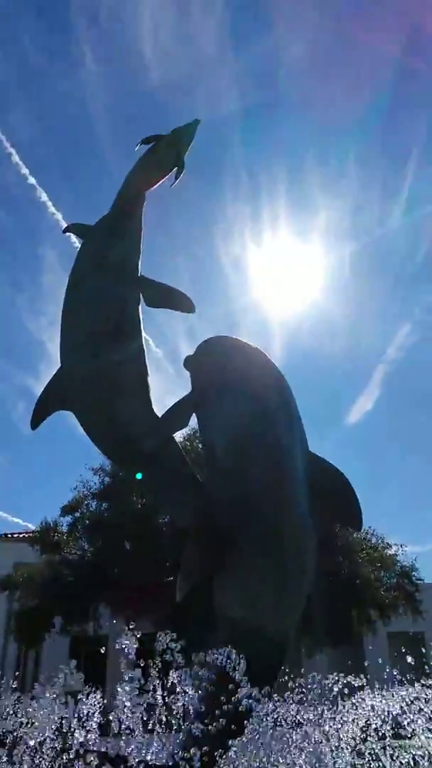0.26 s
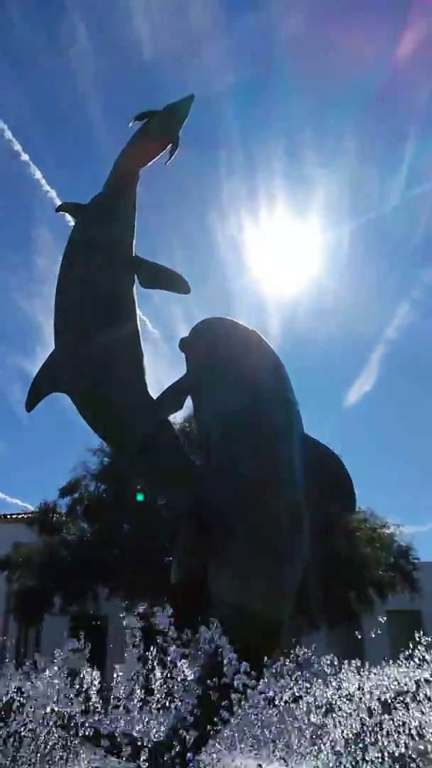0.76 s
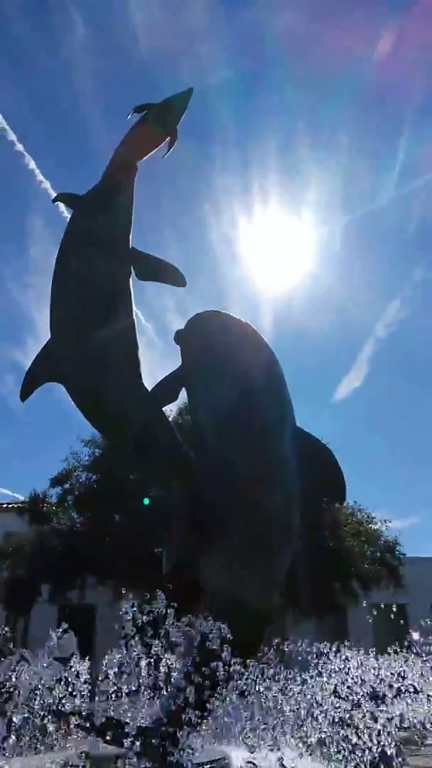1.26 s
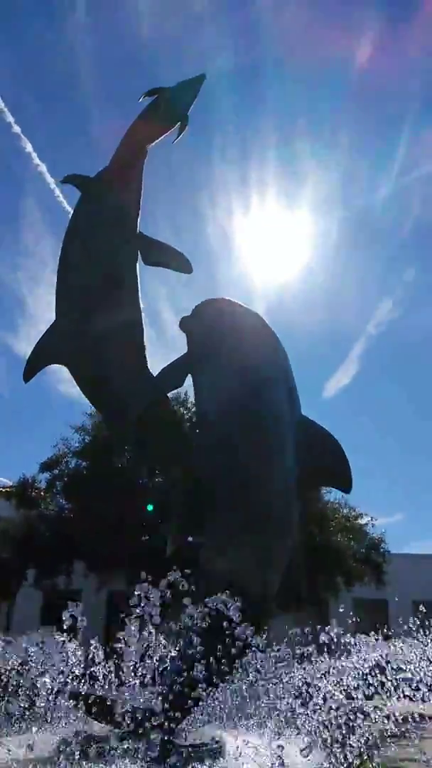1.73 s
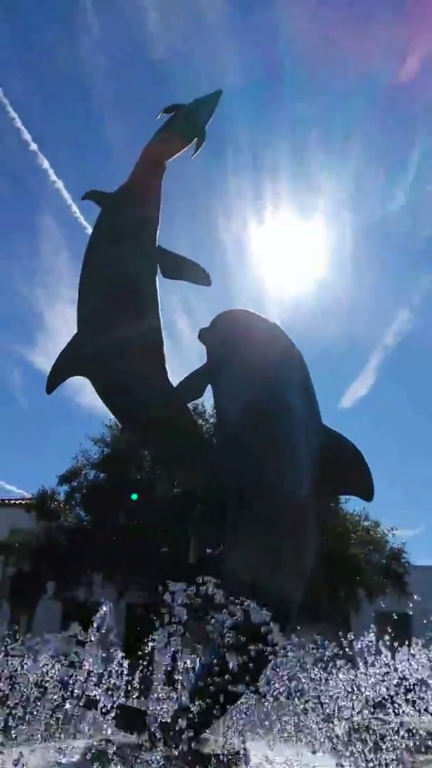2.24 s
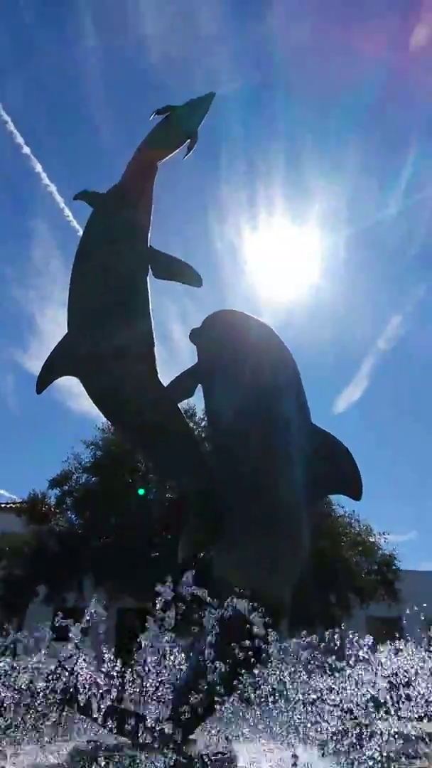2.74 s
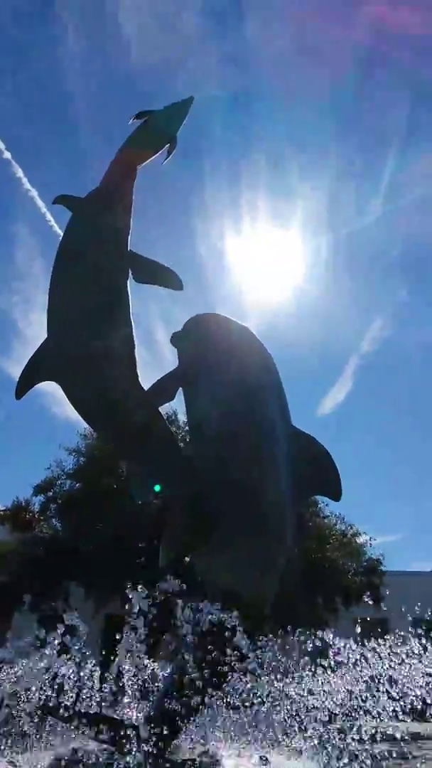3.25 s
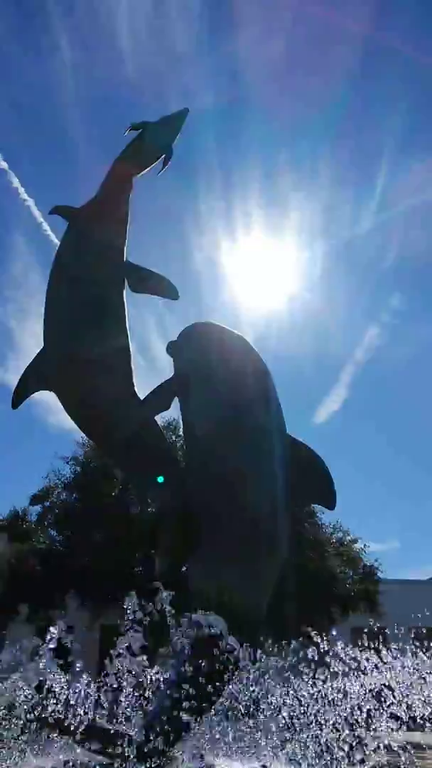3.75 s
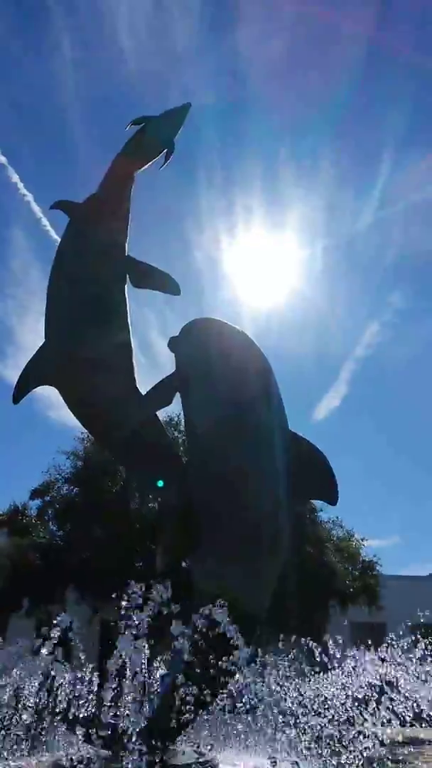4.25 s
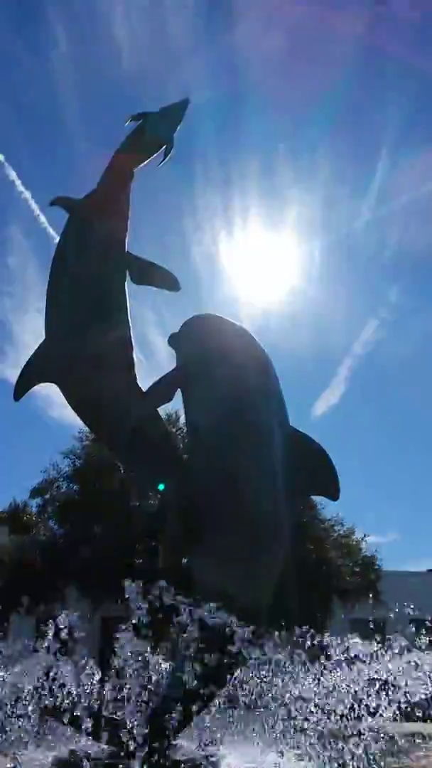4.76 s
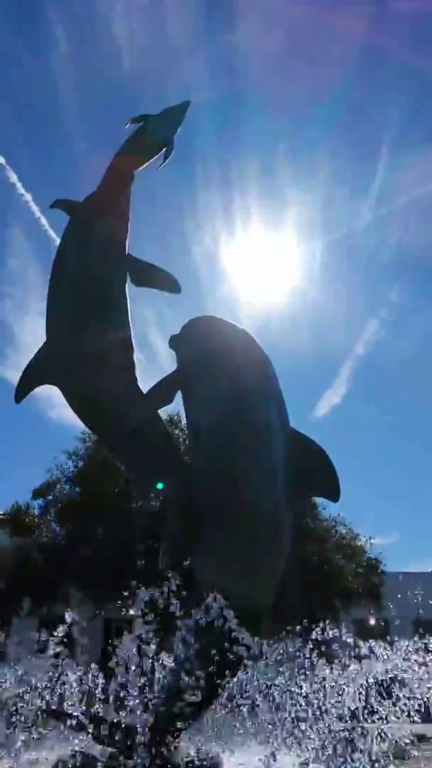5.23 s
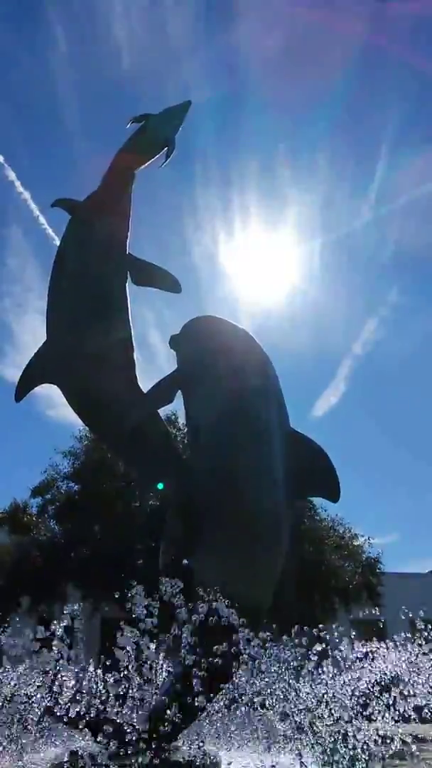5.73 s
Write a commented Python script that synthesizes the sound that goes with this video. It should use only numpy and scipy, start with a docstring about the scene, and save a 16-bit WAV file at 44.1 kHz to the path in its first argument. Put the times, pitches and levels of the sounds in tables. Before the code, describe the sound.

Close outdoor fountain: jets fall back into a basin in a continuous hissing, gurgling rush with plopping bubbles, tiny high tinkles and short hollow drop knocks. Wind thuds low at the very start, gusts roughly between one and two and a half seconds, then eases, with another gust near five seconds. A stereo phone hears bright water mainly on the left; the right is quieter and dull.

```python
"""A basin beside a hollow statue: fountain jets fall back into the water, close to a phone with two microphone ports.
The churn is coloured noise and droplet tones, and rings in a few fixed hollows whose drive simmers and sloshes.
Bubbles plop and tinkle as short tones, big drops knock decaying shell modes, and a few bright cracks are noise.
Wind buffets the ports as lumpy low noise with puffs, and a low two-tone hum comes and goes.
The left port faces the spray; the right one is shaded and dull, and gets the water late and in opposite polarity."""
import sys
import numpy as np
from scipy import signal
from scipy.fft import rfft, irfft, next_fast_len
from scipy.io import wavfile
from scipy.ndimage import uniform_filter1d, map_coordinates

SR = 44100
rng = np.random.default_rng(int(sys.argv[2]) if len(sys.argv) > 2 else 0)


def makeup_ratio(level_db):
    """Linear amplitude ratio for a level in decibels (20 dB per factor of ten)."""
    decades = np.asarray(level_db, float) / 20
    return 10 ** decades


def file_out(sig):
    """Save sig as 16-bit WAV at sys.argv[1]."""
    # one column per channel
    cols = np.atleast_2d(sig).T
    # limit, then scale
    lim = np.clip(cols, -1, 1)
    pcm = np.round(lim * 32767).astype(np.int16)
    wavfile.write(sys.argv[1], SR, pcm)


N = 264159  # samples in the scene
LAG = 17  # samples by which water sounds reach the right port late


def unit(x):
    """Scale to rms 1."""
    return x / np.sqrt(np.mean(x ** 2, axis=-1, keepdims=True) + 1e-20)


def along(points, hz):
    """Read a (frequency, value) curve on a log frequency axis."""
    f, v = np.transpose(points)
    return np.interp(np.log(hz + 1), np.log(f + 1), v)


def curves(rows):
    """One value per sample for each column after the time."""
    s, *cols = np.transpose(rows)
    return np.array([np.interp(np.arange(N) / SR, s, c) for c in cols])


def wobble(rate):
    """A smooth random curve, rate knots a second."""
    knots = rng.standard_normal(int(N * rate / SR) + 4)
    return map_coordinates(knots, [np.arange(N) * rate / SR])


def filtered(x, response):
    """x shaped by a complex response of frequency."""
    m = next_fast_len(N + SR // 2)
    return irfft(rfft(x, m) * response(np.fft.rfftfreq(m, 1 / SR)), m)[..., :N]


def gate(t, start, end, attack, release):
    """Rises from the start, holds, and falls through half at the end."""
    return np.clip(np.minimum((t - start) / attack, (end - t) / release + .5), 0, 1)


# Passages of hum, before waver: (start [s], end [s], pitch before wander [Hz], left level [dB], right level [dB])
HUM_PASSAGES = [(1.05, 1.45, 120, -52, -41), (2.62, 3.08, 141, -54, -46)]


def hum():
    """A wavering low tone with one overtone, in opposite phase at the ports and stronger at the right."""
    overtone_ratio, overtone_db = 1.5, -10
    t, out = np.arange(N) / SR, 0
    for start, end, hz, left_db, right_db in HUM_PASSAGES:
        turns = np.cumsum(hz + 3 * wobble(12)) / SR
        overtone = makeup_ratio(overtone_db) * np.sin(2 * np.pi * overtone_ratio * turns)
        tone = np.sin(2 * np.pi * turns) + overtone
        gain = makeup_ratio([[left_db], [right_db]] + 2.2 * wobble(15))
        out = out + gain * [[1], [-1]] * tone * gate(t, start, end, .08, .04)
    return out


def steadied(x, span, share):
    """Takes part of the chance swell out of a noise, so that it follows its drive; span in seconds."""
    power = np.abs(uniform_filter1d(x ** 2, int(span * SR))) + 1e-12
    return unit(x / power ** (np.clip(share, 0, 1) / 2))


# Wind pressure on the ports, before trim and lumps: (time [s], left level [dB], right level [dB])
WIND_PRESSURE = [(0.0, -21.5, -23), (0.08, -33, -34), (0.5, -37, -34), (0.75, -43, -41), (1.0, -57, -44),
                 (1.08, -32, -39), (1.2, -39, -43), (1.33, -20.5, -32), (1.4, -33, -41), (1.72, -46, -49),
                 (1.84, -28, -45), (1.89, -31, -30), (2.0, -33, -41), (2.14, -31, -33), (2.26, -35, -47),
                 (2.33, -30.5, -33), (2.45, -31, -34), (2.6, -44, -43), (3.0, -49, -43), (3.15, -53, -53),
                 (3.9, -46, -45), (4.1, -50, -50), (4.5, -51, -56), (4.79, -46, -42), (4.84, -26, -42),
                 (4.92, -22.5, -37), (5.0, -40, -33), (5.08, -36, -33), (5.2, -44, -40), (5.8, -51, -52),
                 (5.99, -45, -43)]
# Sudden puffs on the left port: (time [s], level before trim [dB], pitch [Hz])
WIND_PUFFS = [(1.089, -22.5, 98), (1.274, -17.5, 120), (1.318, -27, 100), (1.378, -33, 78.6),
              (1.834, -22.5, 122), (1.986, -21, 71), (2.062, -15.5, 93.4), (2.166, -17.5, 108),
              (2.316, -15, 107), (2.376, -16.5, 95), (4.814, -41, 127), (4.86, -22, 75.4), (4.91, -28, 87)]
# Colour of the buffeting, before levelling: (frequency [Hz], relative level [dB])
BUFFET_COLOUR = [(20, -41), (45, -8), (70, 3.5), (105, 0), (150, -2.5), (220, -16), (330, -34),
                 (600, -42.5), (1500, -65)]


def wind():
    """Lumpy low pressure, mostly each port's own and partly shared in opposite phase, with sudden puffs."""
    noise = rng.standard_normal((2, N))
    noise[1] = 0.63 * noise[1] - 0.5 * noise[0]
    coloured = filtered(noise, lambda hz: makeup_ratio(along(BUFFET_COLOUR, hz)))
    rumble = steadied(coloured, span=0.0676, share=0.52)
    lumps = makeup_ratio(2.6 * np.array([wobble(30), wobble(30)]))
    pressure_db = curves(WIND_PRESSURE)
    out = np.pad(makeup_ratio(pressure_db - 2.5) * lumps * rumble, ((0, 0), (0, SR)))

    # strong gusts turn rough at the left port
    rasp_band = lambda hz: 1 / (1 + (hz / 420) ** 6) / (1 + (220 / (hz + 1)) ** 4)
    rasp = unit(filtered(rng.standard_normal(N), rasp_band))
    out[0, :N] += makeup_ratio(1.445 * pressure_db[0] - 10.5 + 4.6 * wobble(30)) * rasp

    t = np.arange(SR // 10) / SR
    u = t / 0.0089  # time in units of the puff's rise
    for s, db, hz in WIND_PUFFS:
        tone = np.sin(2 * np.pi * (hz * t + rng.random()))
        out[0, round(s * SR):][:len(t)] += makeup_ratio(db - 1.5) * u * np.exp(1 - u) * tone
    return out[:, :N]


def basin(x):
    """The short scattered answer of the basin walls: decaying noise, another one at each port."""
    t = np.arange(SR // 6) / SR
    tail = rng.standard_normal((2, len(t))) * makeup_ratio(-60 * t / 0.17) * (t > .004)
    return signal.fftconvolve(x, tail / np.linalg.norm(tail[0]), axes=1)[:, :N]


# Big drops that strike the statue:
# (time [s], level before trim [dB], left over right before scatter [dB], centre of the favoured modes [Hz])
DROP_KNOCKS = [(0.3614, -26, 8, 2550), (0.4944, -34, 21, 2380), (0.902, -34, 19, 2760),
               (1.051, -31, 14, 2480), (1.074, -31, 18, 2350), (1.1055, -28, 15, 2400),
               (1.4131, -29, 12, 2300), (1.7, -20.5, 14, 2230), (2.169, -33, 19, 2770),
               (2.4917, -17, 9, 2580), (3.4436, -22, 10, 3250), (3.933, -33, 21, 2240),
               (4.2234, -32, 22, 2430), (4.4049, -31.5, 12, 2400), (4.63, -32.5, 11.5, 2340),
               (4.881, -18.5, 9, 2280), (4.8968, -24, 17, 2350), (4.9384, -21.5, 18, 2200),
               (5.4095, -33, 16, 2400), (5.8154, -25, 11, 2300), (5.8775, -31.5, 11, 2380)]
# Bright cracks: (time [s], level before trim [dB])
BRIGHT_CRACKS = [(0.374, -33), (2.4897, -11.5), (5.8147, -41)]
# Modes of the statue's shell: (frequency [Hz], relative level [dB], 60 dB decay before the sustain factor [s])
SHELL_MODES = [(1800, -10, 0.073), (2333, 2, 0.053), (2430, -7.5, 0.12), (2567, 4.5, 0.02),
               (2760, 0.5, 0.039), (2975, -5, 0.068), (3330, -4.5, 0.093)]


def knocks():
    """A drop rings the shell, mostly in the modes near its own pitch; a few short bright cracks are noise."""
    ring, crack = np.zeros((2, N + SR)), np.zeros(N + SR)
    t = np.arange(SR // 5) / SR
    onset = np.sin(np.pi / 2 * np.minimum(t / 0.0015, 1)) ** 2
    for s, db, pan_db, centre_hz in DROP_KNOCKS:
        at = round(s * SR)
        sustain = 1.05 * makeup_ratio(-.55 * (db + 25))  # harder blows wet and damp the shell more
        for port, port_db in enumerate((0, -pan_db)):
            modes = 0
            for hz, level, t60 in SHELL_MODES:
                mode_db = level - 14.5 * ((hz - centre_hz) / 600) ** 2 + rng.normal(0, 1.8)
                tone = np.sin(2 * np.pi * (hz * t + 0.35 * rng.random()))
                modes = modes + makeup_ratio(mode_db - 60 * t / (t60 * sustain)) * tone
            ring[port, at:at + len(t)] += makeup_ratio(db + port_db + 2.0) * modes * onset

    for s, db in BRIGHT_CRACKS:
        snap_and_tail = makeup_ratio(db + 9 - 60 * t / 0.013) + makeup_ratio(db - 13 - 60 * t / 0.35)
        crack[round(s * SR):][:len(t)] += snap_and_tail * rng.standard_normal(len(t))
    crack_band = lambda hz: 1 / (1 + (12500 / (hz + 1)) ** 12) / (1 + (hz / 14900) ** 24)
    return ring[:, :N] + makeup_ratio([[0], [-35]]) * filtered(crack[:N], crack_band)


def blip(hz, length, rise_hz, flutter_hz):
    """A soft-starting bubble tone, unsteady in pitch and strength, whose decay scales with its length."""
    t = np.arange(SR // 5) / SR
    knots = rng.standard_normal((2, 64))
    drift, waver = map_coordinates(knots, [[0 * t, 0 * t + 1], [t * 150, t * 150]])
    u = t / (1.25 * length)
    swell = (1 - np.exp(-u / 0.086)) * np.exp(-1.2 * u * u) * makeup_ratio(3.2 * waver)
    pitch = hz + rise_hz * u + flutter_hz * drift
    return swell * np.sin(2 * np.pi * (np.cumsum(pitch) / SR + rng.random()))


def scattered(favoured_hz, count, detune, db, scatter_db, length):
    """Rows (time [s], pitch [Hz], level [dB], length scale [s]) of chance bubbles near the favoured pitches."""
    when, which = rng.random((count, 2)).T
    a, b, c = rng.standard_normal((count, 3)).T
    hz = np.array(favoured_hz)[(which * len(favoured_hz)).astype(int)] * (1 + detune * a)
    return list(zip(when * N / SR, hz, db + scatter_db * b, length * np.exp(.35 * c)))


# Clear large bubbles: (time [s], pitch before drift [Hz], level before trim [dB], length scale [s])
CLEAR_PLOPS = [(0.181, 1310, -33.5, 0.022), (0.365, 1756, -31, 0.017), (0.844, 575, -35, 0.022),
               (0.891, 604, -31.5, 0.05), (1.101, 1397, -30, 0.022), (1.147, 1746, -28.5, 0.017),
               (1.416, 1550, -28, 0.015), (1.43, 1064, -41, 0.024), (1.82, 626, -35.5, 0.026),
               (1.867, 719, -33, 0.035), (2.048, 1317, -27, 0.019), (2.637, 920, -30, 0.011),
               (2.91, 636, -31.5, 0.029), (2.986, 1294, -27.5, 0.013), (3.049, 729, -32.5, 0.059),
               (3.114, 584, -30, 0.029), (3.352, 1760, -30, 0.0097), (3.413, 710, -27, 0.016),
               (3.47, 703, -26.5, 0.019), (3.561, 534, -32, 0.032), (3.661, 368, -44, 0.091),
               (3.732, 1810, -32.5, 0.02), (3.78, 1720, -29, 0.011), (3.933, 702, -32, 0.02),
               (3.926, 275, -41.5, 0.019), (4.077, 1510, -35.5, 0.031), (4.125, 470, -29, 0.021),
               (4.17, 1055, -35.5, 0.026), (4.234, 1440, -31, 0.013), (4.411, 298, -30.5, 0.024),
               (4.441, 1870, -32.5, 0.028), (4.625, 352, -42.5, 0.069), (4.713, 820, -29, 0.012),
               (4.749, 276, -27.5, 0.012), (4.777, 1740, -34.5, 0.034), (4.795, 620, -28, 0.03),
               (4.806, 310, -36, 0.053), (5.155, 1034, -34, 0.022), (5.157, 1390, -28, 0.015),
               (5.174, 1640, -27, 0.017), (5.339, 364, -45, 0.05), (5.346, 1484, -34.5, 0.038),
               (5.403, 1835, -34.5, 0.02), (5.533, 1610, -27.5, 0.023), (5.546, 516, -35, 0.02),
               (5.57, 370, -41, 0.06), (5.886, 710, -29.5, 0.033), (5.951, 713, -29, 0.023)]
# Clear tiny bubbles: (time [s], pitch before drift [Hz], level before trim [dB], length scale [s])
CLEAR_TINKLES = [(0.32, 7740, -43, 0.083), (0.367, 7700, -35, 0.022), (0.371, 9470, -35.5, 0.022),
                 (0.424, 11010, -34, 0.036), (0.841, 7270, -27, 0.015), (0.885, 7100, -36, 0.022),
                 (1.392, 7290, -38, 0.064), (1.398, 11070, -31, 0.022), (1.849, 11030, -30, 0.018),
                 (1.952, 11010, -31, 0.041), (2.392, 7440, -38, 0.06), (2.486, 7400, -36, 0.036),
                 (2.525, 7740, -33.5, 0.042), (3.43, 6430, -33.5, 0.018), (4.317, 11000, -34.5, 0.025),
                 (4.339, 7400, -39.5, 0.046), (4.419, 6520, -36, 0.022), (4.881, 7690, -34, 0.021),
                 (4.92, 7300, -38, 0.031), (4.96, 11100, -34, 0.022), (5.261, 10130, -25, 0.011),
                 (5.376, 10900, -33, 0.023), (5.865, 11100, -35, 0.031)]
# Favoured pitches of the faint large bubbles: (pitch [Hz])
FAINT_PLOP_PITCHES = [570, 820, 1050, 1500, 1750, 1850]
# Favoured pitches of the faint tiny bubbles: (pitch [Hz])
FAINT_TINKLE_PITCHES = [6450, 6800, 7150, 7350, 7680, 11050]


def bubbles():
    """Large bubbles plop in the basin; tiny ones tinkle in the spray before the left port."""
    out = np.zeros((2, N + SR))
    faint_plops = scattered(FAINT_PLOP_PITCHES, count=30, detune=.04, db=-42, scatter_db=3, length=.026)
    for s, hz, db, length in CLEAR_PLOPS + faint_plops:
        # left over right: the shade grows with pitch
        pan_db = 12.5 + 2.5 * np.log2(hz / 1e3) + 2.5 * rng.standard_normal()
        tone = makeup_ratio(db - 1.0) * blip(hz, length, rise_hz=11, flutter_hz=29)
        at = round(s * SR)
        out[0, at:][:len(tone)] += tone
        out[1, at + LAG:][:len(tone)] -= makeup_ratio(-pan_db) * tone

    faint_tinkles = scattered(FAINT_TINKLE_PITCHES, count=36, detune=.012, db=-41, scatter_db=3, length=.024)
    for s, hz, db, length in CLEAR_TINKLES + faint_tinkles:
        tone = makeup_ratio(db + 1.5) * blip(hz, length, rise_hz=6.6, flutter_hz=40.2)
        out[0, round(s * SR):][:len(tone)] += tone
    return out[:, :N]


def shaded(x):
    """What the right port makes of a sound: inverted and late."""
    return -np.pad(x, (LAG, 0))[:N]


# Depth of random patchiness over time and pitch, deepest in the top treble: (frequency [Hz], depth [dB])
TREBLE_PATCHINESS = [(300, 2.5), (2000, 2), (4000, 4), (8000, 2.3), (11500, 2.7), (14000, 6)]
# Likeness of the two ports for the water: (frequency [Hz], likeness [0-1])
PORT_LIKENESS = [(300, 1), (1400, 0.86), (2300, .45), (3000, 0.4), (5300, 0), (8000, .1)]


def patter():
    """White churn for both ports: hiss in random patches, and short tones of droplets of unequal size."""
    hz, _, z = signal.stft(rng.standard_normal((2, N)), SR, nperseg=1024)
    field = uniform_filter1d(rng.standard_normal(z.shape), size=4, axis=1)
    field = uniform_filter1d(field, size=2, axis=2)
    gain = makeup_ratio(along(TREBLE_PATCHINESS, hz)[:, None] * field / field.std())
    gain = gain / np.sqrt(np.mean(gain ** 2, axis=2, keepdims=True))
    hiss = signal.istft(z * gain, nperseg=1024)[1][:, :N]

    count, longest = 1500, 1500  # droplets at each port, samples of a droplet tone
    t, tones = np.arange(longest), np.zeros((2, N + longest))
    envelope = np.exp(-t / SR / 0.014) * (1 - np.exp(-t / SR / 0.0024)) * np.cos(np.pi / 2 * t / longest)
    for port in range(2):
        when, size, pitch = rng.random((count, 3)).T
        cycles = 350 * 22 ** pitch[:, None] * t / SR  # from 350 Hz up, each gliding upward
        strength = makeup_ratio(-3.5 * np.log(size + 0.0076))[:, None]
        drops = strength * envelope * np.sin(2 * np.pi * cycles * (1 + 1.2 * t / SR))
        places = (when * N).astype(int)[:, None] + t
        tones[port] = np.bincount(places.ravel(), drops.ravel(), N + longest)

    left, own = hiss / hiss.std() + makeup_ratio(-10) * unit(tones[:, :N])
    alike = lambda hz: np.clip(along(PORT_LIKENESS, hz), 0, 1)
    right = filtered(shaded(left), alike) + filtered(own, lambda hz: np.sqrt(1 - alike(hz) ** 2))
    return np.array([left, right])


# Water slops into one hollow: (start [s], hollow it drives [Hz], drive level [dB], length [s])
HOLLOW_SLOSHES = [(0.0, 700, -42, .33), (0.0, 2350, -41, .28), (0.0, 2755, -51, .23),
                  (0.23, 2755, -47, .19), (0.36, 2350, -41, .08), (0.43, 700, -41, .08),
                  (0.49, 2350, -40, .14), (0.78, 2350, -43, .19), (0.79, 2755, -41, .21),
                  (0.9, 700, -41, .41), (1.03, 2350, -40, .14), (1.08, 700, -38, .11),
                  (1.41, 2350, -40.5, .39), (1.47, 700, -44, .1), (1.8, 700, -37.5, .16),
                  (1.82, 1370, -46, .08), (1.83, 2755, -47, .14), (2.14, 2755, -46, .2),
                  (2.37, 2350, -42.5, .08), (2.38, 2755, -41, .2), (2.49, 2350, -38, .12),
                  (2.55, 700, -43, .27), (2.58, 2755, -46.5, .15), (2.72, 1370, -43.5, .1),
                  (2.8, 2350, -44, .14), (2.83, 700, -42.5, .13), (2.86, 2755, -45.5, .12),
                  (3.05, 700, -40, .15), (3.08, 2350, -46, .15), (3.33, 700, -44, .08),
                  (3.4, 2350, -40.5, .1), (3.41, 700, -39.5, .28), (3.44, 2755, -47, .12),
                  (3.5, 2350, -45, .3), (3.66, 2755, -47.5, .11), (3.93, 2350, -43.5, .2),
                  (4.03, 2755, -43.5, .1), (4.05, 700, -42, .2), (4.21, 2755, -41.5, .21),
                  (4.22, 2350, -39.5, .26), (4.35, 700, -41.5, .1), (4.55, 2755, -48, .18),
                  (4.63, 2350, -40, .1), (4.68, 700, -38.5, .24), (4.87, 2350, -35, .1),
                  (4.89, 2755, -43, .08), (4.97, 2350, -38.5, .51), (4.97, 2755, -48, .17),
                  (5.03, 700, -42, .09), (5.12, 700, -38, .23), (5.14, 1370, -46, .12),
                  (5.32, 1370, -44, .12), (5.4, 700, -38, .28), (5.4, 2755, -45.5, .3),
                  (5.53, 1370, -45.5, .07), (5.55, 2350, -42.5, .13), (5.81, 2350, -37, .2),
                  (5.87, 700, -41, .14)]


def drive(simmer_hz, simmer_db, wander_db):
    """Level in dB that drives one hollow: a wandering simmer, and for each slosh a quick rise, a hold and a fall."""
    t = np.arange(0, N, 64) / SR
    power = makeup_ratio(2 * (simmer_db + wander_db * wobble(7)[::64]))  # doubled dB turns amplitude into power
    for s, hz, db, length in HOLLOW_SLOSHES:
        if abs(np.log(hz / simmer_hz)) < 1 / 12:  # this slosh belongs to this hollow
            power = power + makeup_ratio(2 * db) * gate(t, s, s + length, attack=.012, release=.025)
    return np.interp(np.arange(N) / SR, t, 10 * np.log10(power))


# Broad colour heard at the left port: (frequency [Hz], gain [dB])
LEFT_COLOUR = [(150, -45), (320, -42), (470, -41), (1100, -35.5), (1700, -35), (3100, -36), (4200, -34.5),
               (5500, -35), (7000, -32.5), (8800, -33), (10800, -26), (12300, -33.5), (13500, -38.5),
               (15600, -43.5)]
# Broad colour heard at the right port, with the top treble all but empty: (frequency [Hz], gain [dB])
RIGHT_COLOUR = [(150, -54), (320, -47.5), (500, -51), (1200, -47), (2000, -46), (3600, -39), (5800, -42.5),
                (7500, -48.5), (9200, -58.5), (10500, -107), (11500, -90), (14000, -84), (15800, -73)]
# Steady drive of the deep, middle, main and upper hollow: (hollow [Hz], level [dB], slow wander [dB])
HOLLOW_SIMMER = [(700, -48.5, 1.5), (1370, -47.5, 1.3), (2350, -47, 1.5), (2755, -56, 2.5)]
# Resonances, one list for each hollow in the same order, levels relative to its drive:
# (frequency [Hz], width of one pass [Hz], left level [dB], right level [dB])
HOLLOW_MODES = [
    [(598, 110, -10, -31), (723, 138, -2, -31)],
    [(1367, 150, 1, -24)],
    [(2238, 190, -3, -8.5), (2409, 170, 1, -18)],
    [(2755, 200, 2, -18)],
]
# Small air pockets, before their swell: (frequency [Hz], width of one pass [Hz], left level [dB], right level [dB])
AIR_POCKETS = [(343, 95, -65.5, -74.5), (1055, 130, -73, -81), (1537, 200, -63.5, -74),
               (1850, 330, -60, -76), (3050, 190, -57, -73), (3356, 54, -64, -72), (7310, 240, -60.5, -83)]


def water():
    """One churn feeds the broad spray, the hollows and the air pockets, so the ports agree in the low range."""
    churn = patter()
    out = filtered(churn, lambda hz: makeup_ratio([along(LEFT_COLOUR, hz), along(RIGHT_COLOUR, hz)]))

    def hollow(centre, width):
        """Churn through one resonance twice, which keeps the valleys between resonances dark."""
        one_pass = lambda f: 1j * f * width / (centre * centre - f * f + 1j * f * width)
        return unit(filtered(churn, lambda f: one_pass(f) ** 2))

    for simmer, modes in zip(HOLLOW_SIMMER, HOLLOW_MODES):
        drive_db = drive(*simmer)
        burst_db = 2.2 * wobble(40)  # splashes come in ragged bursts
        for centre, width, left_db, right_db in modes:
            favour_db = 1.3 * wobble(12)  # now one resonance leads, now another
            level_db = drive_db + burst_db + favour_db + [[left_db], [right_db]]
            out = out + makeup_ratio(level_db) * hollow(centre, width)
    for centre, width, left_db, right_db in AIR_POCKETS:
        swell_db = 5.45 * wobble(9)  # pockets come forward now and then
        out = out + makeup_ratio(swell_db + [[left_db], [right_db]]) * hollow(centre, width)
    return out


def scene():
    """Hum, wind and water; single bubbles and knocks come with their echoes."""
    events = bubbles() + knocks()
    echoes = makeup_ratio(-7) * basin(events)
    return hum() + wind() + events + echoes + water()


def roll_off(x):
    """The treble ends steeply here."""
    return signal.sosfilt(signal.butter(12, 16110, fs=SR, output="sos"), x)


def record(dry):
    """The finished mix of both ports, as it is stored."""
    return roll_off(dry)


dry = scene()
out = record(dry)
file_out(out)
```